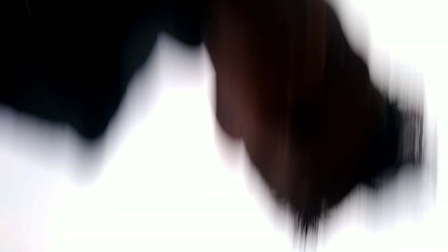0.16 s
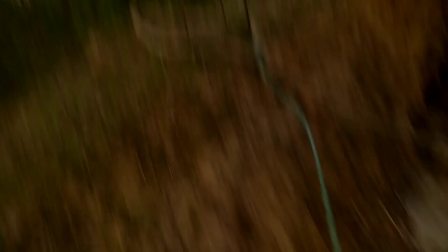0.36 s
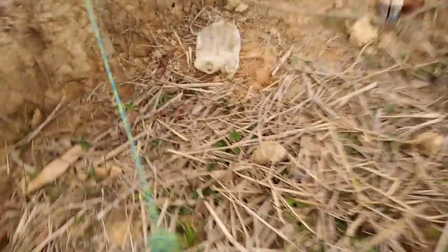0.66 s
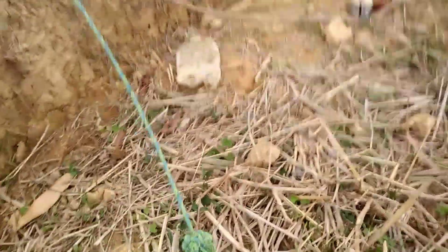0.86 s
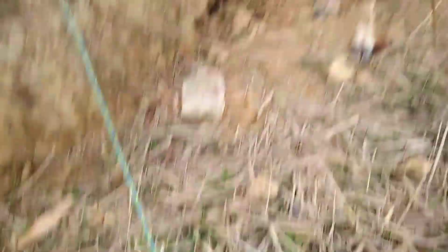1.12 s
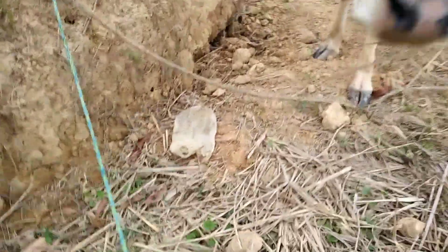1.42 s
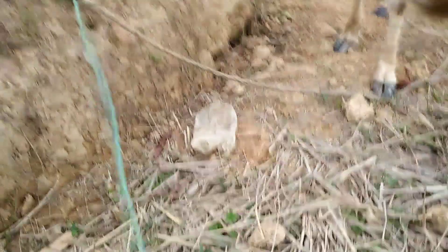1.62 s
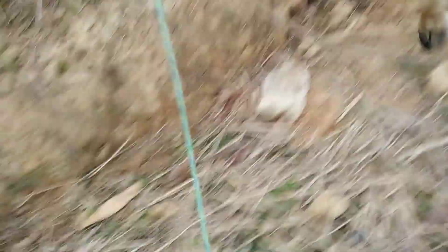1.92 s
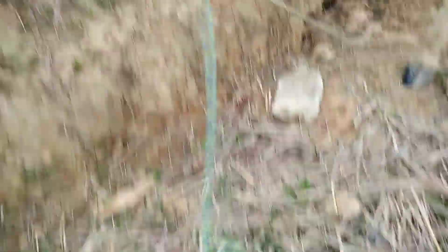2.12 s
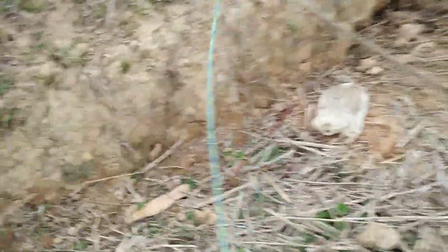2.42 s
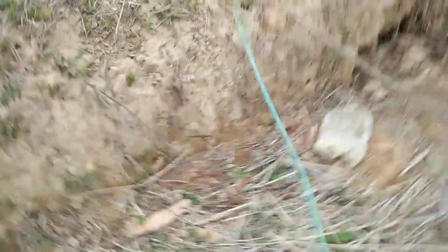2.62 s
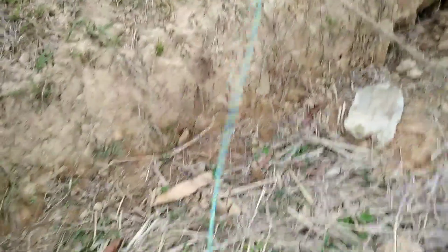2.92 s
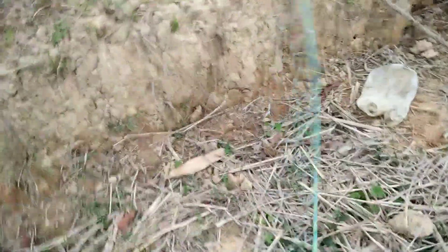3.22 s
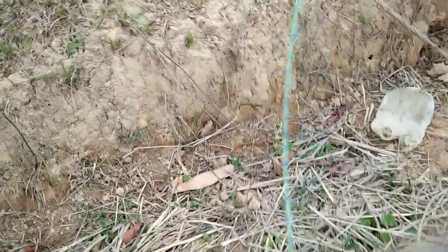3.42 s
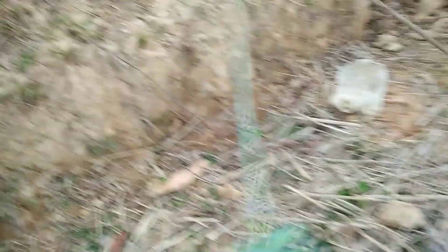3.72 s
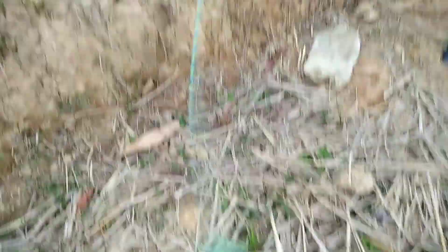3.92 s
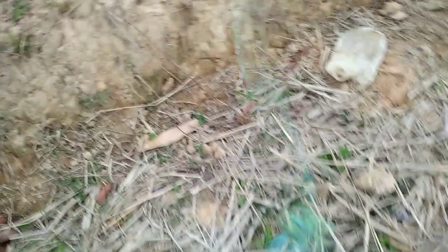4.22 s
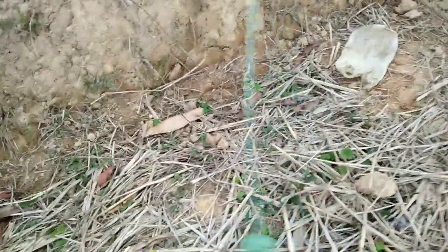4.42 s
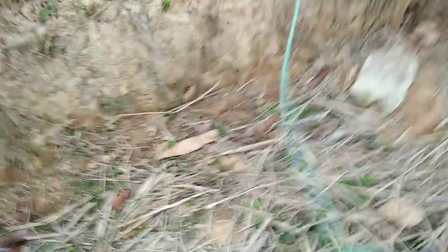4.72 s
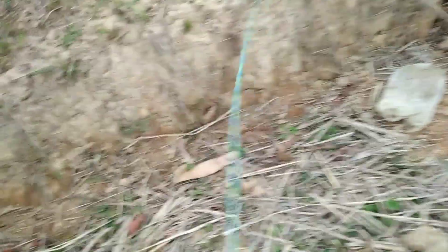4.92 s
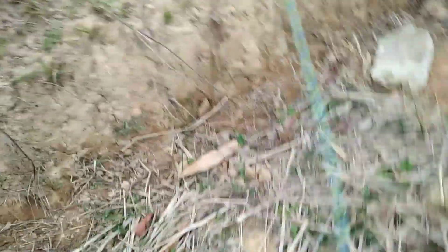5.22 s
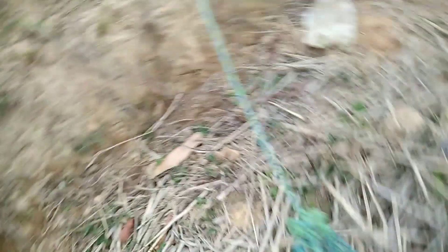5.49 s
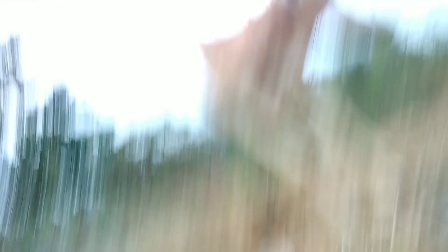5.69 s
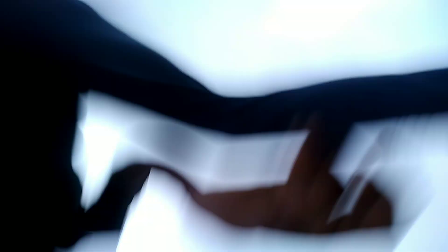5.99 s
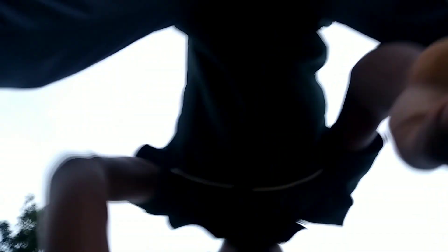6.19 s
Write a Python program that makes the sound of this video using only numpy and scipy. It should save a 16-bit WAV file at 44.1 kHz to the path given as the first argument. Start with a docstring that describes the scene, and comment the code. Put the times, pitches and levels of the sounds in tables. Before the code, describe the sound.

Close, loud sandal steps slap on dry straw about twice a second, each a hard crack with a hollow knock and a short crunchy settling tail. Between them are faint hiss, stalk ticks, soft swishes and low wind puffs jumping between left and right. A slack rope twangs downward once, a small bird chirps three times, and a hand finally scuffs and bumps the body-worn stereo microphone hard.

```python
"""Sandals on dry straw

Someone in loose sandals treads about on dry, straw-covered ground, a small camera hanging from the body.
Wind buffets its two microphone ports as shaped noise, over grainy swishes and ticks of straw. Each sole slaps
down with a hollow knock, decaying tones and crushed stalks in noise. A taut rope twangs once as a sinking tone,
a bird chirps three times in gliding tones, and at the end a hand scuffs and bumps the camera in noise bursts."""
import sys
import numpy as np
from scipy.fft import rfft, irfft, next_fast_len
from scipy.io import wavfile
from scipy.ndimage import uniform_filter1d, map_coordinates

SR = 44100
rng = np.random.default_rng(int(sys.argv[2]) if len(sys.argv) > 2 else 0)


def int16_out(signal):
    """Quantize to a 16-bit WAV file."""
    q = np.round(np.clip(np.atleast_2d(signal).T, -1, 1) * 32767)
    wavfile.write(sys.argv[1], SR, q.astype(np.int16))


N = 280079  # length in samples

# Colour of near sounds, with the port resonance. Each row: frequency in Hz, relative density in dB per Hz.
PORT_COLOUR = [(300, -5), (2000, -6.5), (4000, -7.5), (5200, -6.5), (8600, 5.5), (11000, -2), (14000, -7.5),
               (15400, -41.5)]
CONTACT_S = 0.0027  # the sole takes this long to close on the ground


def amp(db):
    """Gain for a level in dB."""
    return 10 ** (np.asarray(db) / 20)


def unit(x):
    """x scaled to an rms of 1."""
    return x / np.sqrt(np.mean(x ** 2, axis=-1, keepdims=True) + 1e-20)


def curves(rows):
    """One value per sample for each column after the time."""
    s, *cols = np.transpose(rows)
    return [np.interp(np.arange(N) / SR, s, c) for c in cols]


def panned(pan_db):
    """Left and right gains for a level difference, left minus right."""
    return amp(np.array([pan_db, -pan_db]) / 2).reshape(2, -1)


def wobble(rate):
    """A smooth random curve for each channel, rate knots a second."""
    knots = rng.standard_normal((2, int(N * rate / SR) + 4))
    return np.array([map_coordinates(k, [np.arange(N) * rate / SR]) for k in knots])


def filtered(x, response):
    """x times a response of frequency."""
    m = next_fast_len(x.shape[-1] + 8192)
    spectrum = rfft(x, m) * response(np.fft.rfftfreq(m, 1 / SR))
    return irfft(spectrum, m)[..., :x.shape[-1]]


def noise(spectrum, size, alike):
    """Stereo noise of rms 1 with a (Hz, dB) colour; alike is the correlation of the two ports."""
    a, b = rng.standard_normal((2, size))
    turn = np.arccos(np.clip(alike, -1, 1)) / 2
    common, apart = np.cos(turn) * a, np.sin(turn) * b
    pair = np.array([common + apart, common - apart])
    f, db = np.transpose(spectrum)
    return unit(filtered(pair, lambda hz: amp(np.interp(np.log(hz + 1), np.log(f + 1), db))))


def fade(t, t60, attack):
    """A quick rise and an exponential decay."""
    return amp(-60 * t / t60) * (1 - np.exp(-t / attack))


def add(out, s, x):
    """Mix x into out from time s."""
    part = out[:, round(s * SR):][:, :x.shape[1]]
    part += x[:, :part.shape[1]]


def grit(size, depth_db):
    """Gain that changes about every millisecond and a half, so that noise breaks into grains."""
    return amp(depth_db * unit(uniform_filter1d(rng.standard_normal(size), size=64)))


def wind():
    """Turbulence at each port comes in lumps and short puffs; stronger flow reaches higher in pitch."""
    # Steady buffeting. Each row: time in seconds, level before flutter in dB, left minus right in dB.
    buffeting = [(0.0, -48, -5), (0.32, -41, -11), (0.64, -50, 1.5), (0.85, -56, -18), (1.21, -44, 1.5),
                 (1.32, -46, -9.5), (1.65, -50.5, 27.5), (1.73, -42.5, 5.5), (2.17, -53, 18),
                 (2.21, -54.5, -1.5), (3.23, -50, 18.5), (3.41, -58, -8), (3.65, -58.5, 24.5),
                 (4.18, -51.5, 15), (4.47, -52.5, -4), (5.4, -59, 5), (5.95, -37, 7.5), (6.1, -43.5, -9)]
    # Puffs that hit one port. Each row: peak time in seconds, port (0 left, 1 right), strength in dB.
    gusts = [(0.193, 1, -19), (0.442, 1, -25), (0.826, 1, -29.5), (0.934, 1, -32), (1.032, 1, -28.5),
             (1.213, 0, -35), (1.268, 1, -23), (1.339, 1, -27), (1.64, 0, -21), (1.663, 0, -29),
             (1.94, 0, -29.5), (2.498, 0, -30.5), (2.991, 0, -29.5), (3.048, 0, -22.5), (3.117, 0, -29),
             (3.158, 0, -30), (5.685, 0, -32.5), (5.84, 0, -30.5), (5.868, 1, -22.5)]
    # Colour of the turbulence. Each row: frequency in Hz, relative density in dB per Hz.
    rumble = [(15, 5), (60, 5), (130, -3), (300, -17.5), (500, -34), (1000, -62), (2000, -120)]
    rise_s, fall_s = 0.017, .025  # time constants of a puff
    kick_db, kick_s = 6, .0012  # the eddy at the heart of a puff: level over its strength, half width
    flutter_db, thin_hz = 3.5, 40

    t, puffs, kicks = np.arange(N) / SR, np.zeros((2, N)), np.zeros((2, N))
    for s, port, db in gusts:
        away = np.abs((t - s) / np.where(t < s, rise_s, fall_s))
        puffs[round(port)] += amp(db) * np.exp(-away ** 0.99)
        u = (t - s) / kick_s
        push, suction = np.exp(-u ** 2), .5 * np.exp(-((u - 2.5) / 2) ** 2)
        kicks[round(port)] += amp(db + kick_db) * (push - suction)
    level_db, pan_db = curves(buffeting)
    steady = amp(level_db + flutter_db * (wobble(7.6) + 1.4 * wobble(38))) * panned(pan_db)
    flow = steady + puffs
    high = filtered(noise(rumble, N, alike=0), lambda hz: (hz / 300) ** 1.5) * amp(2.7 * wobble(60))
    # a short puff has little deep bass
    thin = filtered(noise(rumble, N, alike=0), lambda hz: hz / (hz + thin_hz))
    low = steady * noise(rumble, N, alike=0) + kicks + .55 * puffs * unit(thin)
    return low + flow * (flow / amp(-12)) ** 1.2 * high  # the top grows faster than the flow


def rustle():
    """Dry stalks and cloth swish in soft grainy swells over the fine hiss of the field."""
    # Swishes of straw and cloth. Each row: centre in seconds, level in dB.
    swishes = [(.03, -51), (.145, -45), (0.632, -48.5), (2.04, -46.5), (2.528, -47.5), (2.955, -50.5),
               (4.052, -49), (4.638, -49), (4.974, -52), (5.511, -54), (5.93, -40.5), (6.048, -43.5)]
    # Colour of swish and hiss. Each row: frequency in Hz, relative density in dB per Hz.
    hiss_colour = [(300, -9.5), (700, -13), (1500, -10.5), (3000, -8), (6000, -7.5), (8700, 1), (11000, -6),
                   (14400, -11)]
    swish_s = .035  # half length of a swish

    t = np.arange(N) / SR
    swell = sum(amp(db) * np.exp(-((t - s) / swish_s) ** 2) for s, db in swishes)
    flicker_db = 0.28 * wobble(9.4).sum(axis=0) + 0.56 * wobble(79).sum(axis=0)
    grains = amp(2.4 * wobble(100)[0]) * grit(N, depth_db=1.5)
    swish = swell * grains * noise(hiss_colour, N, alike=0.059)
    hiss = amp(flicker_db - 53.5) * noise(hiss_colour, N, alike=0.024)
    return filtered(swish + hiss, lambda hz: hz < 14350)


def snaps():
    """Each listed stalk gives one dry tick, and many mostly fainter ones crackle at random."""
    # Single stalks breaking. Each row: start in seconds, level before the low cut in dB.
    stalks = [(0.5012, -35), (0.7642, -33.5), (0.8285, -35.5), (0.842, -34), (1.168, -18), (1.7387, -25.5),
              (2.291, -37.5), (3.1253, -36), (3.493, -36.5), (3.6771, -27.5), (3.718, -31), (4.036, -31),
              (4.2711, -33), (4.9785, -24), (5.25, -37.5), (5.3, -35), (5.7667, -31), (5.961, -22)]
    stalk_hz = 1200  # a thin stalk gives little below this

    out, t = np.zeros((2, N)), np.arange(SR // 20) / SR
    tick = fade(t, .014, .001)
    crackle = [(when * N / SR, -50 - 2.6 * np.log(size)) for when, size in rng.uniform(size=(220, 2))]
    for s, db in list(stalks) + crackle:
        add(out, s, amp(db) * panned(rng.normal(0, 3)) * tick * noise(PORT_COLOUR, len(t), alike=0.09))
    return filtered(out, lambda hz: hz ** 2 / (hz ** 2 + stalk_hz ** 2))


def knock(late, hz):
    """A pocket of air closes, peaks at the contact time, vents, and rings hollow meanwhile."""
    u = late / CONTACT_S
    return u ** 2 * np.exp(2 - 2 * u) * np.sin(2 * np.pi * hz * late)


def steps():
    """Straw gives way, the sole lands, the air under it rings hollow, and crushed stalks settle in grains."""
    # Footfalls. Each row: time in seconds (the slap starts 1 ms later), lead of the yielding straw in seconds,
    # hollow, thud and mean sole pitch in Hz, then levels in dB: hollow, thud, sole modes, smack, crack,
    # settling straw.
    slaps = [(0.317, .002, 954, 495.3, 1557, -14, -7.5, -15, -14.5, -10, -24.5),
             (1.151, .002, 923, 417, 2100, -11, -10, -14.5, -16, -8, -28),
             (1.761, 0.0043, 891, 413, 2164, -7, -13.5, -23, -14, -11.5, -27.5),
             (2.235, 0.0033, 940, 417, 1907, -8, -16, -12.5, -19.5, -10, -27),
             (2.674, 0.0049, 964, 460, 1920, -7.5, -14, -14, -9, -6.5, -32),
             (2.878, 0.002, 916, 362, 2000, -37, -29.5, -61, -36, -37.5, -55),
             (3.289, .009, 900, 477, 2453, -15, -16.5, -16, -9.5, -7.5, -33),
             (3.815, .011, 868, 367.6, 1874, -6, -12, -10, -28, -14.5, -29),
             (4.299, .005, 900.5, 409.4, 1944, -2.5, -5.5, -13.5, -15.5, -7, -25),
             (4.773, .006, 942.5, 417.5, 2016, -3, -4.5, -5.5, -14, -5.5, -39.5),
             (5.01, 0.0024, 924, 299, 2020, -32, -19, -58, -36, -29.5, -52.5),
             (5.374, .001, 853, 430, 1690, -16.5, -13, -15, -37.5, -7, -32.5)]
    # Modes of the sole. Each row: multiple of the sole pitch, mean relative level in dB, t60 in seconds.
    sole_modes = [(.65, 0, 0.018), (1, 5.5, .011), (1.25, 2, 0.014), (1.6, 0, .012), (2.05, -1, 0.014)]
    # Extra knock tones in a footfall, some with the slap, some just after.
    # Each row: start in seconds, pitch in Hz, level in dB.
    extra_knocks = [(0.3183, 666, -16), (.337, 520, -30.5), (1.163, 420, -27.5), (2.891, 880, -38),
                    (3.29, 310, -31), (3.292, 1084, -15.5), (3.309, 900, -33.5), (4.3, 263.8, -22),
                    (5.376, 602, -28), (5.378, 933, -17.5), (5.399, 855, -51)]
    # Flat sole on soil. Each row: frequency in Hz, relative density in dB per Hz.
    smack_colour = [(500, -17), (1300, -5), (2500, -2.5), (4200, -4.5), (6000, -8.5), (8000, -44)]
    # Loose earth settling. Each row: frequency in Hz, relative density in dB per Hz.
    soil_colour = [(150, -31), (400, 0.5), (1000, 0.5), (2500, -7.5)]
    soil_db, yield_db = -22, -14.5  # loose earth under the thud, yielding straw under the crack

    out, t = np.zeros((2, N)), np.arange(SR // 3) / SR
    late = np.maximum(t - np.array([[6 / SR], [0]]), 0)  # the left port is a little further away
    for s, hz, db in extra_knocks:
        add(out, s, amp(db) * knock(late, hz))
    for (s, early, hz, thud_hz, sole_hz,
         hollow_db, thud_db, upper_db, smack_db, crack_db, settle_db) in slaps:
        x = amp(hollow_db) * knock(late, hz)
        x -= amp(thud_db) * fade(late, 0.024, CONTACT_S / 2) * np.sin(2 * np.pi * thud_hz * late)
        for k, level_db, t60 in sole_modes:
            phase = rng.uniform(0, 2 * np.pi) + rng.normal(0, 0.32, (2, 1))
            pitch_hz = k * sole_hz * rng.normal(1, .025)
            scatter_db = rng.normal(0, 2)
            ring = fade(late, t60, 0.00029) * np.sin(2 * np.pi * pitch_hz * late + phase)
            x += amp(upper_db + level_db + scatter_db) * ring
        x += amp(smack_db) * fade(t, 0.021, 0.00074) * noise(smack_colour, len(t), alike=0.1)
        x += amp(crack_db) * fade(t, .013, 0.00041) * noise(PORT_COLOUR, len(t), alike=0.14)
        # grains come in clumps
        clumps = amp(3 * unit(uniform_filter1d(rng.standard_normal(len(t)), size=300)))
        crumbs = grit(len(t), depth_db=2.5) * clumps
        x += amp(settle_db) * fade(t, 0.19, 0.0092) * crumbs * noise(PORT_COLOUR, len(t), alike=0.033)
        x += amp(thud_db + soil_db) * fade(t, 0.11, 0.0021) * noise(soil_colour, len(t), alike=1.0)
        add(out, s + .001, x)
        # yielding straw swells until the slap starts
        lead = early + .001
        yielding = np.sqrt(t / lead) * (t < lead) * grit(len(t), depth_db=3)
        add(out, s - early, amp(crack_db + yield_db) * yielding * noise(PORT_COLOUR, len(t), alike=.1))
    return out


def rope():
    """The twang swells and dies while its pitch sinks as the tension lets go."""
    # Fundamental and two overtones: relative level of each in dB.
    overtones_db = [0, -24, -34]
    start_s, level_db, rise_s = 2.309, -32, 0.0096  # the first swell peaks after twice the rise
    taut_hz, slack_hz, sag_s = 287, 141, 0.037  # pitch at the pluck, pitch at rest, sinking time constant

    out, t = np.zeros((2, N)), np.arange(SR // 4) / SR
    sinking_hz = slack_hz + (taut_hz - slack_hz) * np.exp(-t / sag_s)
    phase = 2 * np.pi * np.cumsum(sinking_hz + 7 * wobble(70.5)[0, :len(t)]) / SR
    swell = (t / (2 * rise_s)) ** 2 * np.exp(2 - t / rise_s)
    swell = swell + amp(-6) * fade(t, 0.36, 0.026)  # a longer tail
    tone = sum(amp(db) * np.sin((k + 1) * phase) for k, db in enumerate(overtones_db))
    level = amp(level_db + 1.9 * wobble(80)[0, :len(t)])
    add(out, start_s, level * panned(0.74) * swell * tone)
    return out


def bird():
    """Each chirp climbs to its top and drops off fast; a hedge returns a weak echo."""
    # Chirps. Each row: start in seconds, length in seconds, pitch it climbs towards in Hz, level in dB.
    chirps = [(3.398, .047, 6330, -53), (3.502, 0.049, 6470, -50), (3.604, .048, 6520, -45.5)]

    out = np.zeros((2, N))
    for s, length, top_hz, db in chirps:
        u = np.arange(round(length * SR)) / (length * SR)
        glide = 1 - .13 * np.exp(-u / .25) - .17 * u ** 10
        hz = top_hz * (glide + .012 * wobble(200)[0, :len(u)])
        swell = np.sqrt(np.abs(np.sin(np.pi * u ** 1.3)))
        call = amp(db) * panned(0) * swell * np.sin(2 * np.pi * np.cumsum(hz) / SR)
        call = call * grit(len(u), depth_db=3.5)  # a slightly hoarse whistle
        add(out, s, call)
        add(out, s + 0.037, amp(-15) * call)
    return out


def handling():
    """Fingers scrape the case in grains; a knock rattles it and pumps the right port, which leaks back slowly."""
    # Fingers on the case. Each row: time in seconds, level in dB, left minus right in dB.
    scuffs = [(6.136, -37.5, -9.5), (6.146, -26.5, -14.5), (6.168, -19, -14.5), (6.195, -34.5, 8.5),
              (6.215, -26, 8), (6.3, -45, -7.5), (6.33, -40, 17.5)]
    # Knocks on the case. Each row: start in seconds, left and right rattle levels in dB,
    # strength of the pressure step at the right port in dB.
    bumps = [(6.133, -21.5, -8, -29), (6.155, -20.5, -2.5, -24.5), (6.2174, 4, 9, 0)]
    # Rattle of the knocked case. Each row: frequency in Hz, relative density in dB per Hz.
    case_colour = [(30, -1.5), (120, -4), (350, 5), (900, -8.5), (2800, -15), (5000, -20), (7500, -13.5),
                   (14000, -28)]

    near_silence = (scuffs[0][0] - .004, -90, 0)
    level_db, pan_db = curves([near_silence] + list(scuffs))
    out = amp(level_db) * grit(N, depth_db=1.5) * panned(pan_db) * noise(PORT_COLOUR, N, alike=0)
    t = np.arange(SR // 4) / SR
    for s, left_db, right_db, step_db in bumps:
        x = amp([[left_db], [right_db]]) * fade(t, 0.02, 0.00081) * noise(case_colour, len(t), alike=0.22)
        leak = 1.6 * np.exp(-t / .026) - .4 * np.exp(-t / .2)  # sinks past rest, then returns
        x[1] += amp(step_db) * (1 - np.exp(-t / 0.0008)) * leak
        add(out, s, x)
    return out


def scene():
    """All layers summed."""
    return wind() + rustle() + snaps() + steps() + rope() + bird() + handling()


def record(dry):
    """The converter clips with a rounded knee at full scale and keeps nothing above its band limit."""
    top_hz = 15482
    clipped = dry / (1 + np.abs(dry) ** 8) ** (1 / 8)
    return np.clip(filtered(clipped, lambda hz: hz < top_hz), -1, 1)


dry = scene()
out = record(dry)
int16_out(out)
```